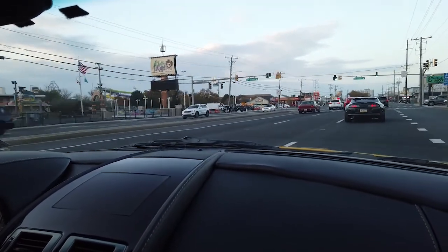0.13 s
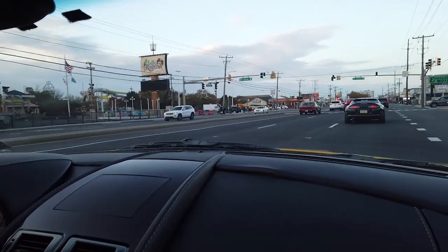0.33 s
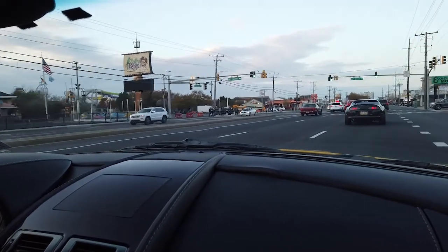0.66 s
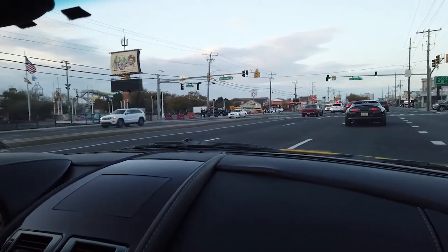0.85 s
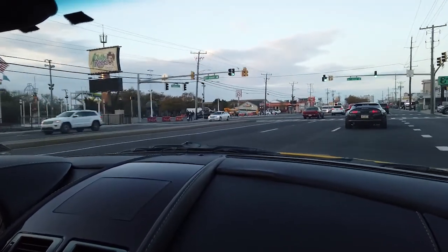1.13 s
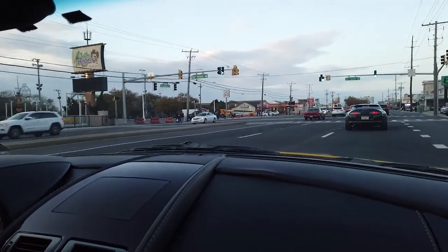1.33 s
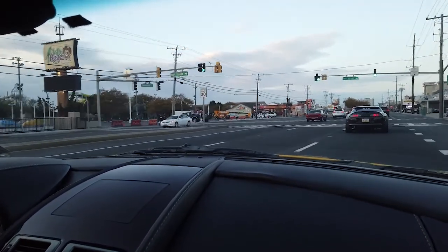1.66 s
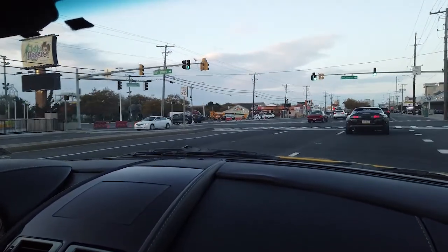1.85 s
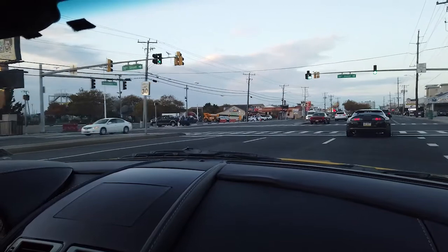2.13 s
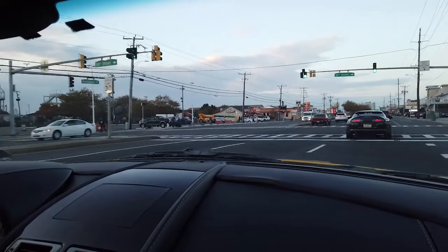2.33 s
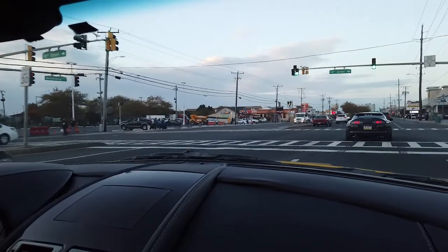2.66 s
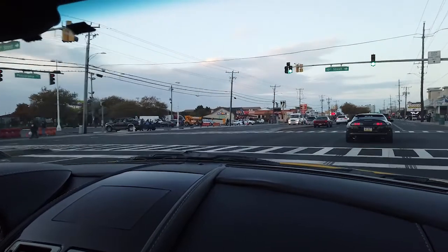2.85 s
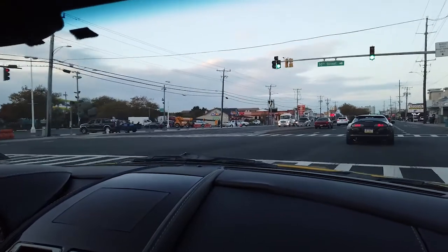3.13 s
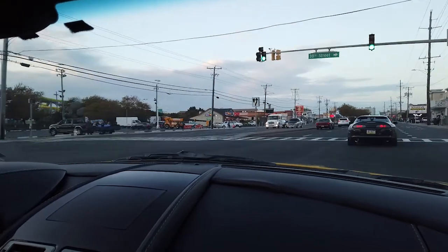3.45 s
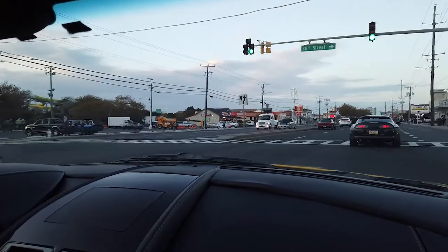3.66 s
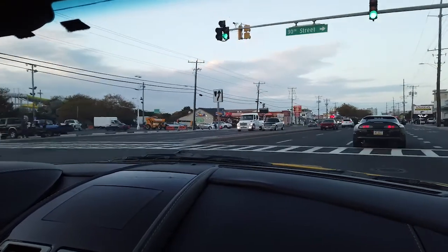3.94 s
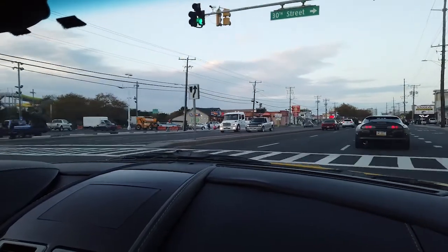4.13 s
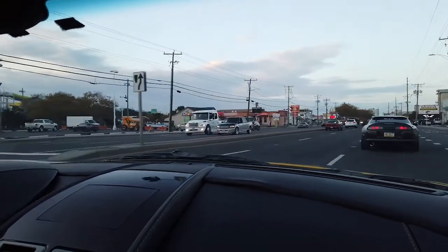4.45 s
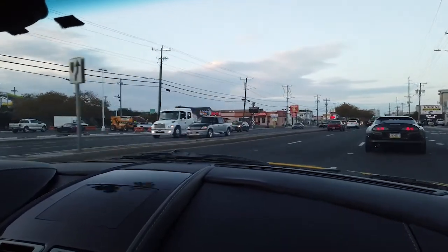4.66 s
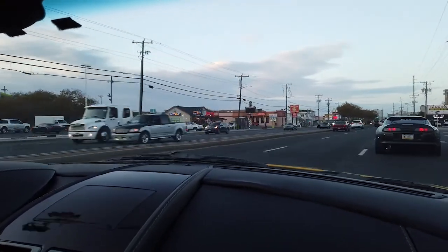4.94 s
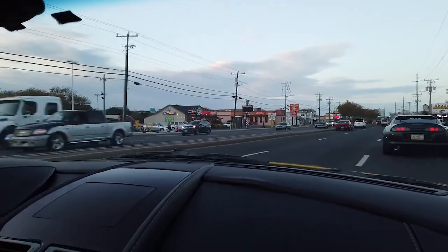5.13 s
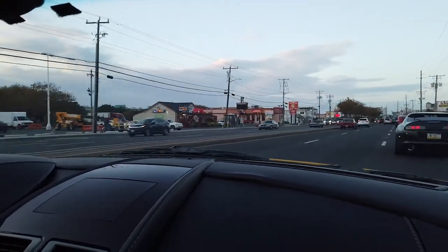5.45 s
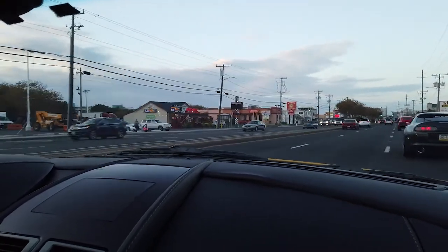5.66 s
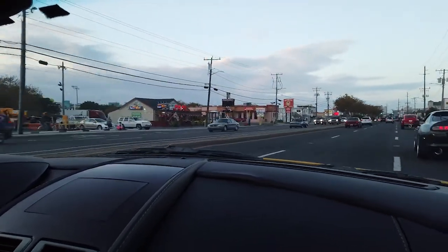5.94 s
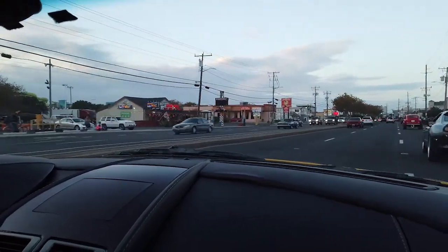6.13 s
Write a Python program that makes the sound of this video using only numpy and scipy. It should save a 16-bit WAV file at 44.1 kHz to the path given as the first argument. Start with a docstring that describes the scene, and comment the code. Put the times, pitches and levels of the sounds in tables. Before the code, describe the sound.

Close stereo microphones inside a car driving through traffic. Deep road rumble and a soft engine hum open; the hum drops as the throttle closes, then returns as a firm boom near two seconds. A car alongside rasps and growls upward in pitch from the middle. Crossing the junction brings a cluster of dull thumps and panel knocks, then a crisp trim tick, faint squeaks and soft rustling.

```python
"""Car cabin in traffic

The six-cylinder engine booms as a few wavering crank orders, faintly with the throttle shut, loudly once open.
An uneven eight in the next lane pulls away as sliding multiples of its cycle, with a rasping tailpipe.
Joints thud as decaying body swings; ticks, squeaks, a rustle and a high sizzle are rung noise or short tones.
Coloured noise makes the road, tyre and wind sound; all of it reaches two close microphone ports."""
import sys
import numpy as np
from scipy import signal
from scipy.fft import rfft, irfft, next_fast_len
from scipy.io import wavfile
from scipy.ndimage import uniform_filter1d

SR = 44100
rng = np.random.default_rng(int(sys.argv[2]) if len(sys.argv) > 2 else 0)


def materialize(psi):
    """Save the field psi as 16-bit PCM at rate SR to the path in sys.argv[1].

    A 1-D psi becomes a single channel; in a 2-D psi each row is a channel.
    """
    bounded = np.clip(np.atleast_2d(psi).T, -1, 1)
    quanta = np.round(bounded * 32767).astype(np.int16)
    wavfile.write(sys.argv[1], SR, quanta)


N = 277389

# Own engine speed: time_s, firing_rate_hz
FIRING_RATE = [(0, 152.4), (.6, 151.8), (1.05, 148), (1.45, 144), (1.85, 141.6), (2.3, 142), (2.9, 141.3),
               (3.6, 142.2), (4.6, 143.4), (5.4, 144.2), (6.29, 144.9)]
# Cabin boom at the firing rate, throttle shut from 0.7 to 1.8 s: time_s, level_db
BOOM_LEVEL = [(0, -41.5), (.5, -39), (.62, -39.5), (.75, -51), (1.05, -44), (1.3, -50.5), (1.68, -51.5),
              (2.06, -26.5), (2.3, -31.5), (2.78, -27.5), (2.91, -34), (3.04, -30), (3.3, -32.5),
              (3.5, -26), (3.86, -31), (4.36, -28), (4.8, -26.5), (5.55, -31), (5.63, -27.5), (5.97, -25.5),
              (6.12, -28.5), (6.29, -27.5)]
# Overtones of the firing tone: time_s, third_db, fourth_db
OVERTONE_LEVELS = [(0, -53.5, -55.5), (.47, -47, -51.5), (.75, -70, -70), (1.9, -71, -60), (2.08, -45, -54),
                   (2.3, -56, -59.5), (2.42, -51.5, -48), (2.6, -51.5, -57.5), (2.7, -57.5, -50),
                   (2.85, -56, -51.5), (2.93, -55.5, -59), (3.1, -48.5, -52), (3.2, -53, -44.5),
                   (3.42, -56, -61), (3.5, -47, -52.5), (4.0, -56, -51), (4.2, -55.5, -56), (4.4, -57, -54),
                   (4.65, -50.5, -54.5), (4.8, -49.5, -47), (5.01, -67, -53), (5.15, -45.5, -55.5),
                   (5.65, -55.5, -54), (5.87, -44.5, -45), (5.97, -58.5, -51), (6.11, -46.5, -49),
                   (6.29, -45, -49)]
# Second crank order, strongest before the throttle opens: time_s, level_db
SECOND_ORDER_LEVEL = [(0, -40), (.6, -43.5), (1.1, -43.5), (1.8, -41.5), (2.6, -44), (4.2, -48),
                      (5.3, -49.5), (6.29, -52.5)]
# Weaker crank orders, three firings a turn: order_per_turn, level_db
WEAK_ORDERS = [(5, -62), (6, -57), (7, -59.5), (15, -62), (18, -64.5)]

# Next-lane engine speed: time_s, cycle_rate_hz
CYCLE_RATE = [(0, 20), (2.4, 20), (3.1, 19.9), (3.45, 20.15), (3.85, 20.55), (4.65, 21.3), (5.1, 21.7),
              (5.45, 21.9), (6.29, 21.9)]
# Next-lane engine loudness: time_s, level_db
NEXT_LEVEL = [(0, -50), (1, -47.5), (2, -46), (3, -49), (3.5, -37), (4.3, -35.5), (4.7, -37), (5.1, -40),
              (5.9, -48.5), (6.29, -50)]
# Its steadier multiples: multiple_per_cycle, relative_db
STEADY_MULTIPLES = [(8, -1.5), (13, -15), (16, -17)]
# Its more wavering multiples: multiple_per_cycle, relative_db
WAVERING_MULTIPLES = [(7, -7), (9, -6), (10, -12), (11, -7.5), (12, -32), (14, -20), (15, -19)]
# Body resonances that the multiples slide through: centre_hz, width_hz, lift_db
BODY_RESONANCES = [(262.36, 16, 14), (349.6, 19, 14)]
# Rasp of the next-lane exhaust under load: time_s, level_db
RASP_LEVEL = [(.4, -70), (1.1, -56), (1.9, -62), (2.2, -52), (2.3, -55), (2.36, -48), (2.42, -48),
              (2.46, -56), (2.51, -43), (2.6, -44), (2.7, -48), (2.9, -49.5), (3.05, -54), (3.25, -51),
              (3.5, -52), (3.8, -79)]
# Tailpipe resonances: centre_hz, width_hz, relative_db
PIPE_MODES = [(770, 60, -2), (850, 60, 0), (930, 60, -1)]

# Road joints and the body swing they excite: start_s, drive_db, body_mode_hz
JOINT_THUDS = [(2.29, -13.5, 44.6), (2.969, -13, 29.8), (3.547, -14, 42.4), (3.712, -7, 45.4),
               (3.83, -18, 91.3), (3.906, -12, 30.3), (3.948, -7.5, 32.8), (3.997, -10, 56),
               (4.053, -8, 42.2), (4.572, -7.5, 43.3), (4.762, -7.5, 41.2)]
# Panel knocks on the hardest bumps: start_s, panel_peak_db, panel_hz
PANEL_KNOCKS = [(3.175, -36.5, 570), (3.21, -37, 840), (3.255, -39.5, 807), (4.56, -39, 1320),
                (4.578, -36, 906), (4.605, -41, 760), (4.705, -34.5, 627), (4.732, -30.5, 756),
                (4.77, -41, 897), (4.81, -47.5, 780)]
# Trim ticks, with the share of low and top modes: start_s, drive_db, low_modes_db, top_mode_db
TRIM_TICKS = [(2.125, -52, -7, -14), (2.91, -39.5, 6.5, -45), (3.039, -35, -2, -8), (3.07, -53, -12, -18),
              (3.719, -58.5, -17, -22), (4.378, -58.5, -16, -24), (5.0315, -34.5, -2, -3),
              (5.043, -38, -2, -12), (5.052, -44, 0, -15)]
# Resonances of the trim: centre_hz, width_hz, relative_db
TRIM_MODES = [(2300, 1200, 3), (3420, 330, -1), (4160, 450, 0), (5200, 450, -2.5), (6030, 450, 2),
              (7110, 600, 1.5), (8100, 900, 0), (8950, 500, 3), (9750, 450, 0.5), (10700, 410, 2.5),
              (11600, 700, -4), (13500, 3500, -3.5)]
# Short tones of the panels: centre_s, peak_db, pitch_hz, half_length_s
PANEL_SQUEAKS = [(2.917, -62, 9690, .014), (2.92, -55, 3450, .015), (5.037, -56, 10600, .005),
                 (5.03, -58, 6070, .006), (5.165, -56, 2270, .025), (5.22, -69.5, 3480, .03),
                 (5.28, -69, 3630, .025), (6.07, -62.5, 3500, .025), (3.806, -47.5, 1444, 0.04),
                 (4.609, -29.5, 215, 0.091), (5.53, -51, 1443, 0.045), (6.002, -49.5, 1442, 0.046),
                 (5.657, -58, 3020, .015), (5.69, -59, 3320, .02), (5.797, -63.5, 3530, 0.013),
                 (5.862, -59, 3450, 0.021), (6.225, -61, 3500, .01)]
# Soft rustle close by, its dull part: time_s, level_db
RUSTLE_LEVEL = [(5.02, -70), (5.3, -76.5), (5.45, -76.5), (5.75, -65.5), (6.1, -69.5), (6.22, -65),
                (6.29, -67)]

# Spectral density of the road noise, relative: frequency_hz, density_db
ROAD_SPECTRUM = [(12, -15), (25, 0.5), (48, 2.5), (76, -16), (130, -12), (200, -22), (300, -25.5),
                 (420, -29), (650, -30.5), (1000, -37.5), (1300, -38.5), (2000, -40), (3300, -53),
                 (4800, -62), (7500, -69.5), (12000, -71.5), (13500, -93.5), (16000, -92)]
# Cabin resonances in the road noise: centre_hz, width_hz, lift_db
CABIN_RESONANCES = [(93.5, 5.4, 0), (768, 40, 7), (905, 196, 7.5), (1439, 200, 6.5), (2070, 44, 0.5),
                    (2675, 29, 6)]
# Likeness of the road noise at the two ports: frequency_hz, common_power_share (0 to 1)
PORT_LIKENESS = [(30, .9996), (70, .9985), (110, .995), (250, .976), (600, .98), (1200, .95), (1700, .99),
                 (2500, .8), (4000, .5), (5500, .1), (8000, 0)]
# Centres of body rumble, suspension, floor pan, tyre roar, wind and air hiss: centre_hz
LAYER_CENTRES = (40, 95, 260, 800, 2200, 8000)
# Roughness of the road, worst across the junction: time_s, roughness_db
ROUGHNESS = [(0, 0), (.12, 1.5), (1.9, -2), (2.3, 2), (2.9, 0), (3.15, 3.5), (3.4, 1), (3.6, 7.5),
             (4.05, 9.5), (4.25, 1), (4.52, 2), (4.6, 10), (4.85, 7.5), (5.3, 1.5), (5.7, -1), (6.29, 1.5)]
# Response of body rumble, suspension and floor pan to roughness: share_db_per_db
ROUGHNESS_SHARES = (0.55, 0.59, 0.85)
# Upper road noise: time_s, tyre_roar_db, wind_db, air_hiss_db
UPPER_LAYERS = [(0, 2, -1.5, 3), (1.5, 1, 1.5, 0.5), (2.7, 3, 2.5, -0.5), (3.3, 2.5, 1.5, -.5),
                (4.1, -2.5, -1.5, -4.5), (4.8, 0.5, -1.5, -2.5), (5.5, 0, 0, -.5), (6.29, -0.5, 1, 2)]

PORT_LAG_S, SIDE_LAG_S, ENGINE_LAG_S, TICK_LAG_S = 5e-5, .00022, .0001, .0002
THUD_T60_S, THUD_RISE_S = .21, .011
TICK_T60_S, TICK_RISE_S, TICK_TAIL_T60_S, TICK_TAIL_DB = .032, .003, .12, -15
RATTLE_DB, RATTLE_PER_S, MODE_SCATTER_DB = 2.5, 600, 2.5
CHIRPS_FROM_S, CHIRP_TOP_DB, CHIRP_HZ, CHIRP_SPREAD_HZ, CHIRP_HALF_S = 5.1, -63.5, 3500, 300, .017
RUSTLE_BRIGHT_DB, SWISH_S, SWISH_DB, SWISH_WIDTH_S = -20, 6.192, -62, .045
LUMPS_DB, LUMPS_PER_S, FLICKER_DB = 1.0, 20, 1.0
TOP_HZ = 15700


def undb(db):
    """Logarithmic level: decibels to amplitude gain."""
    return 10 ** (np.asarray(db) / 20)


def curves(table):
    """Linear interpolation: the columns after time, one value a sample."""
    s, *columns = np.transpose(table)
    return [np.interp(np.arange(N) / SR, s, column) for column in columns]


def log_curve(f, table):
    """Interpolation along log frequency, as spectra are drawn."""
    hz, values = np.transpose(table)
    return np.interp(np.log(f), np.log(hz), values)


def lift_db(f, resonances):
    """Resonant gain: each mode lifts the level by a bell around its centre."""
    return sum(db / (1 + (2 * (f - hz) / width) ** 2) for hz, width, db in resonances)


def walk(rate):
    """Smoothed random modulation: levels held 1 / rate s and averaged twice; spread near 1."""
    hold = int(SR / rate)
    steps = np.repeat(rng.standard_normal(N // hold + 1), hold)
    return 1.27 * uniform_filter1d(uniform_filter1d(steps, hold), hold)[:N]


def ring(x, hz, width):
    """Resonance: a two-pole filter with gain 1 at its centre."""
    return signal.lfilter(*signal.iirpeak(hz, hz / width, SR), x)


def ring_twice(x, hz, width):
    """Cascaded resonance: two equal filters steepen the skirts."""
    return ring(ring(x, hz, width), hz, width)


def unit(x):
    """Normalisation: scaled to rms 1."""
    return x / np.sqrt(np.mean(x ** 2))


def add(track, s, sound):
    """Superposition: mixes a short sound in at a time."""
    i = int(s * SR)
    track[..., i:i + sound.shape[-1]] += sound[..., :N - i]


def decay(t, t60_s):
    """Exponential damping: the level falls 60 dB in t60_s."""
    return undb(-60 * t / t60_s)


def rise(t, rise_s):
    """Exponential build-up of a struck mode."""
    return 1 - np.exp(-t / rise_s)


def tone(turns, db, waver_db, slip):
    """Engine order: a phase-locked sine whose level and timing waver with uneven burns."""
    level = np.sqrt(2) * undb(db + waver_db * walk(18))
    phase_turns = turns + slip * walk(12) + rng.random()
    return level * np.sin(2 * np.pi * phase_turns)


def ports(x, lag_s):
    """Arrival-time difference: a phase slope makes the right port later than the left by lag_s."""
    turn = np.exp(1j * np.pi * np.fft.rfftfreq(N, 1 / SR) * lag_s)
    return np.array([irfft(rfft(x) * turn, N), irfft(rfft(x) / turn, N)])


def own_engine():
    """Periodic combustion: a firing tone, its overtones and weaker crank orders share one phase."""
    third_db, fourth_db = curves(OVERTONE_LEVELS)
    firings = np.cumsum(curves(FIRING_RATE)[0]) / SR
    crank_turns = firings / 3
    out = tone(firings, curves(BOOM_LEVEL)[0], 1.1, .035)
    out = out + tone(3 * firings, third_db, 3, .17)
    out = out + tone(4 * firings, fourth_db, 2.5, .18)
    out = out + tone(2 * crank_turns, curves(SECOND_ORDER_LEVEL)[0], 3, .1)
    return out + sum(tone(order * crank_turns, db, 3, .1) for order, db in WEAK_ORDERS)


def next_engine():
    """Uneven firing: the period is two crank turns, so many multiples of that cycle sound."""
    rate = curves(CYCLE_RATE)[0]
    cycles, level_db = np.cumsum(rate) / SR, curves(NEXT_LEVEL)[0]
    out = np.zeros(N)
    for multiples, waver_db in [(STEADY_MULTIPLES, 1.6), (WAVERING_MULTIPLES, 1.8)]:
        for multiple, relative_db in multiples:
            k = round(multiple)
            db = level_db + relative_db + lift_db(k * rate, BODY_RESONANCES)
            out += tone(k * cycles, db, waver_db, .035)
    return out


def buzz(spread_db=1.5, rasp=.045, puff_cycles=.5, jitter_cycles=.04):
    """Pulse-excited pipe: one strong cylinder pops once a cycle, unevenly, and gas rasps after it."""
    cycles = np.cumsum(curves(CYCLE_RATE)[0]) / SR - .15 + jitter_cycles * walk(20)
    count = cycles.clip(0).astype(int)
    pops = np.diff(count, prepend=0).clip(0)
    gas = rasp * rng.standard_normal(N) * np.exp(-(cycles % 1) / puff_cycles)
    # every pop weights the pipe modes anew
    size_db = spread_db * rng.standard_normal((200, len(PIPE_MODES)))[count]
    pipe = np.zeros(N)
    for k, (hz, width, db) in enumerate(PIPE_MODES):
        drive = (pops + gas) * undb(db + size_db[:, k])
        pipe += ring(ring(drive, hz, width), hz, 2 * width)
    return unit(pipe) * undb(curves(RASP_LEVEL)[0])


def joints(knock_t60_s=.095, panel_width_hz=260, pan_db=-18):
    """Damped oscillation: joints swing the body a few cycles; hard bumps ring a panel and the floor pan."""
    out, t = np.zeros(N), np.arange(SR // 3) / SR
    for s, db, hz in JOINT_THUDS:
        swing = np.sin(2 * np.pi * hz * t) * decay(t, THUD_T60_S) * rise(t, THUD_RISE_S)
        add(out, s, undb(db) * swing)
    for s, db, hz in PANEL_KNOCKS:
        shake = rng.standard_normal(len(t)) * decay(t, knock_t60_s) * rise(t, .0056)
        panel = ring_twice(shake, hz, panel_width_hz)
        pan = ring_twice(shake, 217, 30)
        knock = panel / abs(panel).max() + undb(pan_db) * pan / abs(pan).max()
        add(out, s, undb(db) * knock)
    return out


def ticks():
    """Modal excitation: a rattling snap from the right rings the trim, partly unlike at the two ports."""
    out, t = np.zeros((2, N)), np.arange(SR // 5) / SR
    rattle = undb(RATTLE_DB * walk(RATTLE_PER_S))
    for s, db, low_db, top_db in TRIM_TICKS:
        common, apart = rng.standard_normal(len(t)), rng.standard_normal((2, len(t)))
        fade = decay(t, TICK_T60_S) + undb(TICK_TAIL_DB) * decay(t, TICK_TAIL_T60_S)
        fade = fade * rise(t, TICK_RISE_S) * np.resize(rattle[int(s * SR):], len(t))
        left_later = np.array([np.roll(common, round(TICK_LAG_S * SR)), common])
        snap = (left_later + .99 * apart) * fade
        trim = np.zeros_like(snap)
        for hz, width, mode_db in TRIM_MODES:
            share_db = low_db if 3000 < hz < 5000 else top_db if hz > 12000 else 0
            gain = undb(mode_db + share_db + MODE_SCATTER_DB * rng.standard_normal())
            trim += gain * ring(ring_twice(snap, hz, width), hz, 2 * width)
        add(out, s, undb(db) * trim)
    return out


def squeaks(count=60):
    """Windowed tones: narrow blips swell and fade; faint high chirps come at random with the rustle."""
    out, chirps = np.zeros(N), []
    for when, fall, detune in rng.random((count, 3)):
        s = CHIRPS_FROM_S + when * (N / SR - CHIRPS_FROM_S)
        hz = CHIRP_HZ + CHIRP_SPREAD_HZ * (2 * detune - 1)
        chirps.append((s, CHIRP_TOP_DB - 18 * fall, hz, CHIRP_HALF_S))
    for s, db, hz, half_s in [*PANEL_SQUEAKS, *chirps]:
        t = np.arange(int(2 * half_s * SR)) / SR
        swell = np.sin(np.pi * t / (2 * half_s)) ** 2
        add(out, s - half_s, undb(db) * np.sin(2 * np.pi * hz * t) * swell)
    return out


def rustle():
    """Friction noise: patchy filtered rubbing starts dull and ends in a bright swish."""
    t, dull_db = np.arange(N) / SR, curves(RUSTLE_LEVEL)[0]
    swish = undb(SWISH_DB) * np.exp(-((t - SWISH_S) / SWISH_WIDTH_S) ** 2)
    start = np.clip((t - RUSTLE_LEVEL[0][0]) / .1, 0, 1)
    dull, bright = rng.standard_normal((2, 2, N))
    dull = ring(ring_twice(dull, 3500, 1500), 3500, 1500) + 1.2 * ring(dull, 3520, 300)
    dull = unit(dull) * undb(dull_db + 3 * walk(50))
    bright = (ring_twice(bright, 10000, 11000) + .5 * ring(bright, 4800, 1500)
              + 1.4 * ring(bright, 10400, 900))
    bright_level = (undb(dull_db + RUSTLE_BRIGHT_DB) + swish) * undb(1.5 * walk(48))
    return start * (dull + unit(bright) * bright_level)


def road(level_db=-31):
    """Filtered noise: body and cabin colour it, half-octave bands follow the road and flicker alone."""
    size = next_fast_len(N)
    f = np.fft.rfftfreq(size, 1 / SR) + 1e-3  # keeps the logarithm finite
    colour_db = log_curve(f, ROAD_SPECTRUM) + lift_db(f, CABIN_RESONANCES)
    alike = np.clip(log_curve(f, PORT_LIKENESS), 0, 1)
    common, left, right = rfft(rng.standard_normal((3, size)))
    turn = np.exp(1j * np.pi * f * PORT_LAG_S)
    pair = np.sqrt(alike) * common * [turn, 1 / turn] + np.sqrt(1 - alike) * np.array([left, right])
    pair = pair * undb(colour_db)
    # level before the layers swing it
    pair = pair * undb(level_db) / np.std(irfft(pair, size))
    rough_db = curves(ROUGHNESS)[0]
    layers = [share * rough_db for share in ROUGHNESS_SHARES] + curves(UPPER_LAYERS)
    layers[0] = layers[0] + LUMPS_DB * walk(LUMPS_PER_S)
    out = np.zeros((2, N))
    for hz in 14 * 2 ** np.arange(0, 10.6, .5):
        band = np.cos(np.pi * np.clip(np.log2(f / hz), -.5, .5)) ** 2
        # each band blends the two layers nearest in log frequency
        place = np.interp(np.log(hz), np.log(LAYER_CENTRES), np.arange(6))
        db = sum(max(1 - abs(place - k), 0) * layer for k, layer in enumerate(layers))
        out += undb(db + FLICKER_DB * walk(9)) * irfft(pair * band, size)[:, :N]
    return out


def sizzle(level_db=-87.5, drop_from_s=3.4, drop_db=-4):
    """Narrow-band noise: a faint high sizzle flickers and thins out halfway."""
    noise = unit(ring_twice(rng.standard_normal((2, N)), 10500, 650))
    late = np.clip((np.arange(N) / SR - drop_from_s) / .3, 0, 1)
    return noise * undb(level_db + drop_db * late + 3.2 * walk(40))


def scene():
    """Superposition of all sources at the two ports; the next lane lies off to one side."""
    engines = ports(own_engine(), ENGINE_LAG_S) + ports(next_engine(), SIDE_LAG_S)
    shared_lag = ports(buzz() + joints() + squeaks(), PORT_LAG_S)
    return engines + shared_lag + ticks() + rustle() + road() + sizzle()


def record(dry):
    """Band limiting: a steep elliptic low-pass cuts the top."""
    return signal.sosfilt(signal.ellip(8, .2, 70, TOP_HZ, fs=SR, output="sos"), dry)


dry = scene()
out = record(dry)
materialize(out)
```